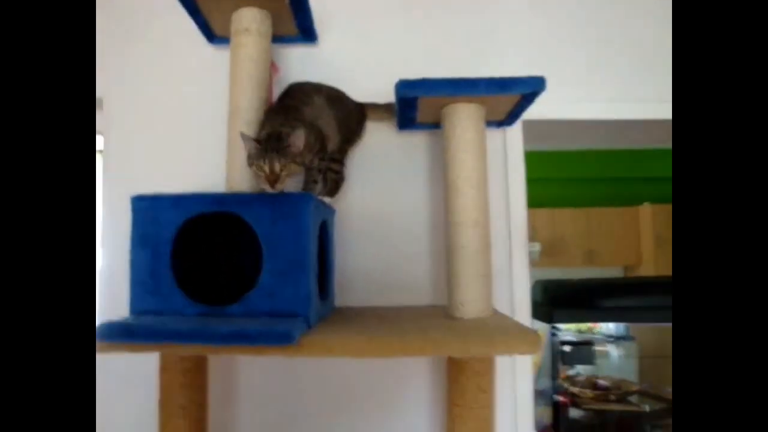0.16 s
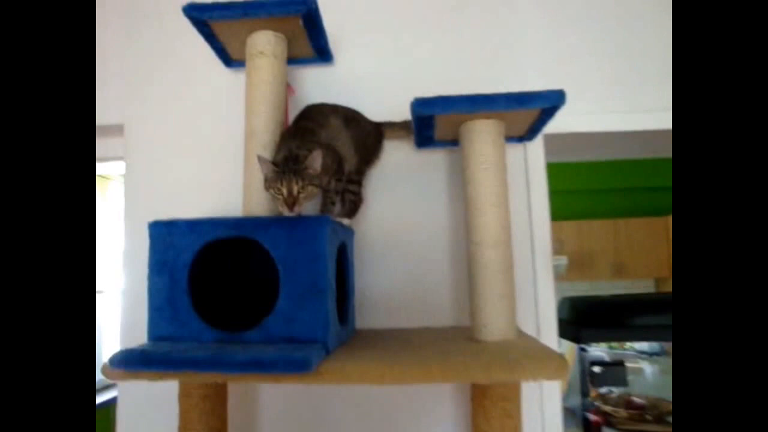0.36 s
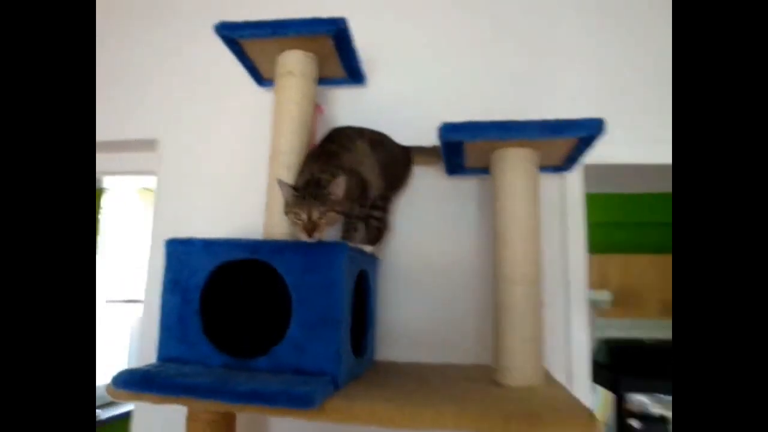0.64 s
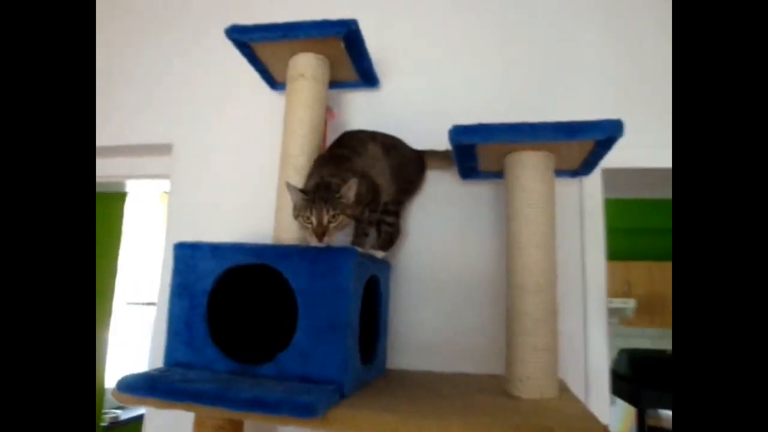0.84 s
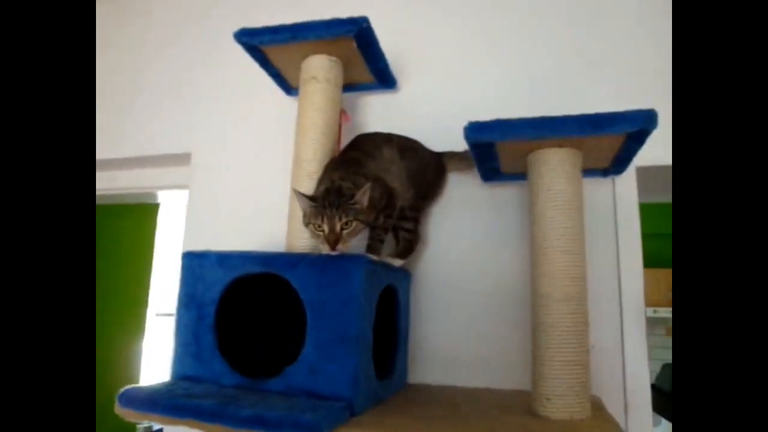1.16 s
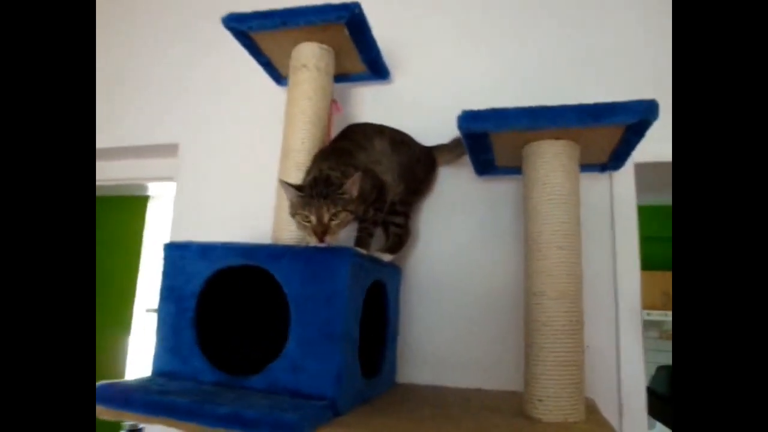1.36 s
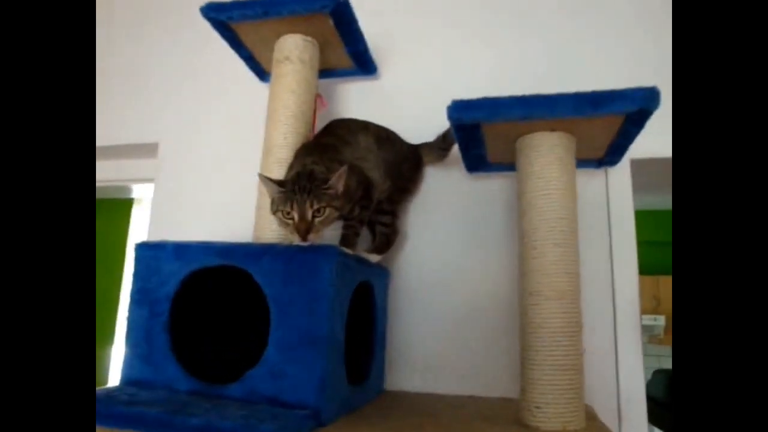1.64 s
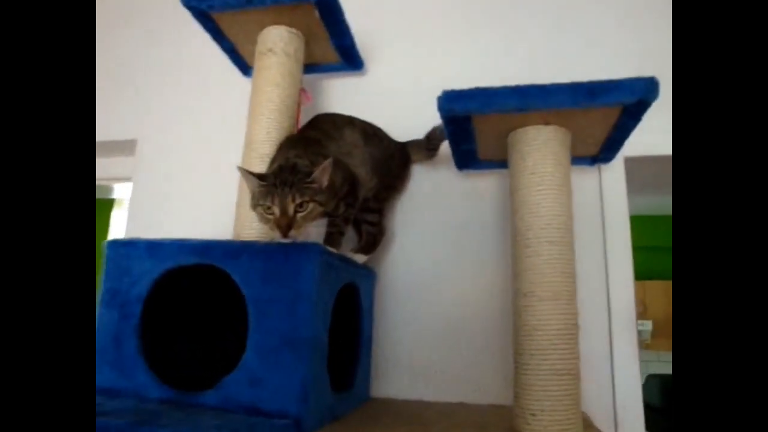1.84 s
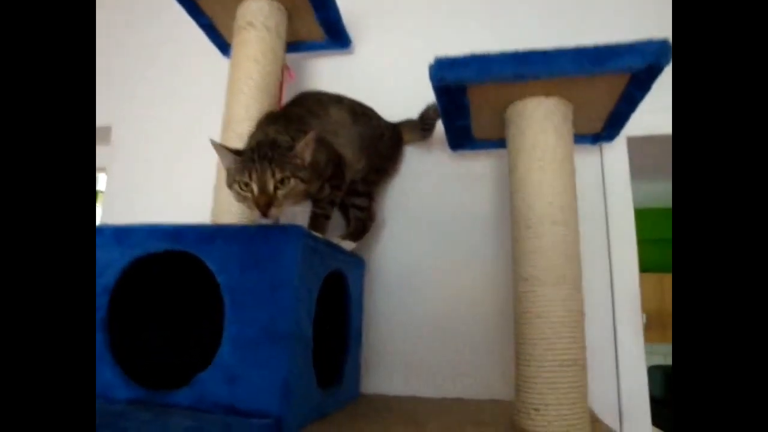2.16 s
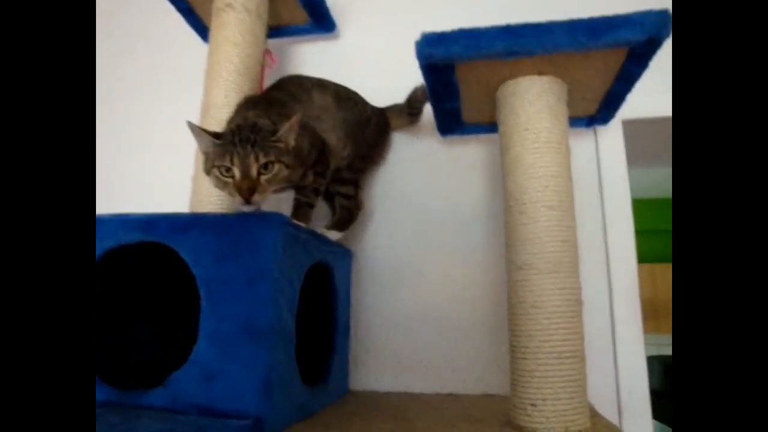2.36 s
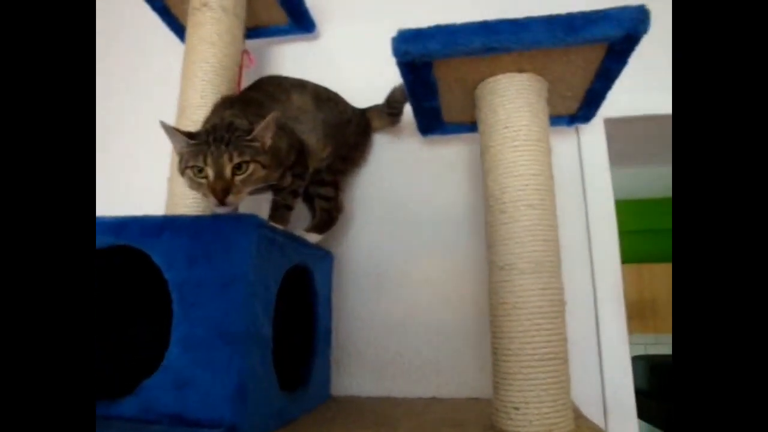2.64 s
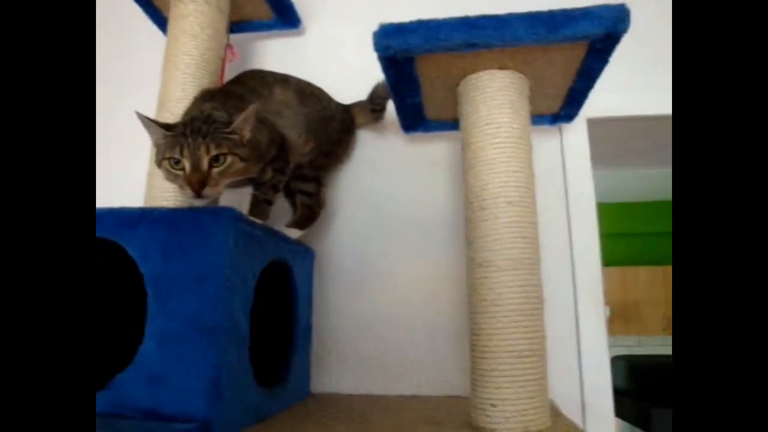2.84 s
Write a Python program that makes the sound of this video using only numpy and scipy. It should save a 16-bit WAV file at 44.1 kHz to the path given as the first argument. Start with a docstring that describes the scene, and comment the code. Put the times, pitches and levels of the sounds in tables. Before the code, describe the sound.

A cat's angry, closed-mouth yowl in a reverberant room, a couple of metres away. A dull knock at 0.1 s and sharp click at 0.2 s sit close to the microphone, then faint rubbing and short hisses at 0.5 and 0.9 s. From 1.1 s the yowl climbs, peaks near 1.5, wavers, and sinks by 2.6 into a rasping growl until 3. Light taps at 1.4, 1.8 and 2.2-2.3; steady hush.

```python
"""Angry yowl in a living room

A cat on a scratching tower, a couple of metres away, gives one closed-mouth yowl that climbs out of a grumble,
arches, wavers and sinks into a low growl: harmonics shaped by throat resonances, roughened by a trill and rasp.
Short hisses of turbulent noise precede it. Dry knocks and clicks at the microphone and light taps in the room
are damped modes with contact noise; faint rubbing and a steady hush are filtered noise, with a faint hum."""
import sys
import numpy as np
from scipy import signal
from scipy.fft import rfft, irfft
from scipy.io import wavfile

SR = 44100
rng = np.random.default_rng(int(sys.argv[2]) if len(sys.argv) > 2 else 0)


def persist_wave(psi):
    """Save psi, clipped to +-1, as 16-bit WAV."""
    counts = np.round(np.clip(psi, -1, 1) * 32767).astype(np.int16)
    wavfile.write(sys.argv[1], SR, np.atleast_2d(counts).T)


N = 132300

# Spectrum of the hush: (frequency [Hz], relative level per hertz [dB])
HUSH_SPECTRUM = [(18, -38), (30, -11), (76, -22), (186, -14.5), (220, -11.5), (243, -6), (317, -14.5),
                 (349, -6), (568, -8.5), (859, -9.5), (1960, -16), (5060, -17.5), (10000, -22),
                 (13000, -91), (22000, -120)]
# Partials of the hum: (frequency [Hz]) and (peak level [dB])
HUM_FREQUENCIES = (351, 443.6)
HUM_LEVELS = (-61.5, -63.5)
# Spectrum of contact noise: (frequency [Hz], relative level [dB])
CONTACT_SPECTRUM = [(150, -22.5), (700, 3.5), (1300, 0), (3000, 0), (6000, -2), (7200, -6.5),
                    (10000, -16.5)]
# Dull knock at the microphone: (time [s], level [dB], contact noise re level [dB])
KNOCK_BLOW = (0.0832, -20, -13.5)
# Modes of the knocked body: (frequency [Hz], relative level [dB], 60 dB decay time [s])
KNOCK_BODY = [(199, -18, 0.022), (400, -6, 0.016), (907, 5.5, 0.009), (1340, 3, 0.017), (1810, -20, 0.019)]
# Sharp clicks at the microphone: (time [s], level [dB], contact noise re level [dB])
CLICK_BLOWS = [(0.1012, -35, -18), (0.118, -42.5, -8), (0.188, -14.5, -10.5), (0.1889, -15, -12.5)]
# Modes of the clicking body: (frequency [Hz], relative level [dB], 60 dB decay time [s])
CLICK_BODY = [(230, -13.5, 0.016), (590, -6.5, 0.012), (785, -12.5, 0.032), (1097, -22, 0.041),
              (1413, -15, 0.033), (2100, -24, 0.034), (2420, -16, 0.022), (3160, -26, 0.017),
              (4200, -3, 0.014), (4730, -5, 0.016), (5420, -0.5, 0.0074), (7050, -14, 0.009),
              (8120, -5, 0.0062)]
# Taps in the room: (time [s], level [dB], contact noise re level [dB], pitch ratio [1], scuff level [dB])
TAP_BLOWS = [(.393, -42, -24, 0.92, -75), (1.36, -29.5, -21, 1.022, -70), (1.365, -27.5, -14, 1.01, -62),
             (1.829, -31, -20, 0.98, -71), (2.2369, -29, -14.5, 0.923, -49.5),
             (2.2945, -26, -19, 1.02, -52.5)]
# Modes of the tapped body at pitch ratio 1: (frequency [Hz], relative level [dB], 60 dB decay time [s])
TAP_BODY = [(1230, -2, 0.019), (1376, -2.5, 0.021), (1645, -2.5, 0.0089), (2217, -4, 0.01),
            (3300, -7, 0.0063), (4500, -22, 0.0049)]
# Spectrum of the scuffing: (frequency [Hz], relative level [dB])
SCUFF_SPECTRUM = [(800, -28), (2300, 10), (3300, -6), (4500, 1), (6200, -1), (7300, -20), (10000, -23)]
# Puffs of breath: (time [s], level [dB], centre frequency [Hz], width [Hz])
HISS_PUFFS = [(0.49, -49.5, 4630, 2600), (0.889, -38.5, 2510, 1970)]
# Pitch of the voice: (time [s], frequency [Hz])
VOICE_PITCH = [(1.09, 106.7), (1.16, 144), (1.2, 198), (1.25, 286.6), (1.3, 393.4), (1.36, 476.7),
               (1.43, 534), (1.52, 563.7), (1.59, 547.3), (1.68, 472.4), (1.79, 380.7), (1.9, 328),
               (1.98, 305.3), (2.08, 326.3), (2.18, 323.6), (2.28, 356.1), (2.38, 326), (2.46, 301.8),
               (2.5, 273.7), (2.55, 209.8), (2.6, 180.2), (2.7, 176.3), (3.0, 181.4)]
# Vocal effort: (time [s], fundamental level [dB], overtone level [dB], roughness [0-1], trill [0-1])
VOCAL_EFFORT = [(1.05, -85, -92, 0.3, 0), (1.15, -62, -83, 0.1, 0.1), (1.205, -51.5, -59, 0.7, 0.5),
                (1.23, -55, -50.5, .6, 0.5), (1.29, -48.5, -43, 0.6, .6), (1.345, -39, -39, 0.1, 0.3),
                (1.5, -38, -40, 0.01, 0.24), (1.61, -43, -41, 0.37, 0.2), (1.69, -37, -38.5, 0.14, 0.15),
                (1.8, -51.5, -38.5, 0.1, 0.5), (1.95, -63, -42.5, 0.08, .5), (2.17, -57, -46, 0.18, 1),
                (2.28, -51, -36.5, 0.08, 0.8), (2.4, -62.5, -43.5, 0.11, 0.2), (2.485, -57, -44, 0.29, 0.9),
                (2.51, -58, -37, .06, 0.1), (2.545, -54.5, -39.5, 0.19, 0.5),
                (2.575, -45.5, -45.5, 0.4, 0.6), (2.66, -55, -53, 0.62, 0.7), (2.72, -49.5, -51, 0.85, .4),
                (2.83, -51, -57, 0.74, 0.4), (3.0, -50, -59.5, 0.97, 0.2)]
# Throat with the mouth nearly shut: (frequency [Hz], gain [dB])
THROAT_RESPONSE = [(200, -4), (350, -5), (470, 3.5), (560, 0.5), (680, -11), (820, -18), (980, -15),
                   (1130, -27), (1350, -28.5), (2000, -42), (3500, -45)]
# Flutter and pulsing in the yowl's loudness: (centre time [s], half-length [s], rate [Hz], depth [0-1])
LOUDNESS_FLUTTERS = [(1.25, .07, 26, 0.3), (1.748, 0.1, 50, 0.25), (2.329, 0.11, 36, 0.5),
                     (2.75, 0.094, 15, 0.27)]

HUSH_DB, HUM_WAVER = -53.5, 0.0036  # waver: rms fraction of frequency
RUSTLE_S, RUSTLE_WIDTH_S, RUSTLE_DB = 0.36, 0.1, -54
KNOCK_RISE_S, CLICK_RISE_S, TAP_RISE_S = 0.0013, 0.00027, 0.0001  # time constants
KNOCK_CRACK_T60_S, CLICK_CRACK_T60_S, TAP_CRACK_T60_S = 0.021, 0.022, 0.15
SCUFF_RISE_S, SCUFF_DECAY_S, SCUFF_GRAIN_DB, SCUFF_GRAIN_HZ = 0.0025, 0.041, 6, 169.05
HISS_ATTACK_S, HISS_HOLD_S, HISS_RELEASE_S, HISS_BROAD_DB = 0.018, 0.017, 0.026, -7
# Irregularity at full roughness: rms fractions of pitch and gain, their rate, and the rasp level
JITTER, SHIMMER, FLUTTER_HZ, RASP_DB = 0.02, 0.088, 75, -11.5
SCATTER_RAD, SCATTER_HZ = 1.93, 67.4  # rms phase scatter of each overtone at full roughness
TRILL_HZ, TRILL_DEPTH, TRILL_SWING = 66.1, 0.13, 0.041  # a second vibration: fractions of gain and pitch
WAVER, WAVER_HZ = 0.007, 28  # rms fraction of pitch, at any roughness
THROAT_FOLLOW, THROAT_PITCH_HZ = 0.11, 332  # exponent and reference of the resonance shift with pitch
ROOM_T60_S, ROOM_GAP_S = 0.57, 0.0044
VOICE_ROOM_DB, HISS_ROOM_DB, TAP_ROOM_DB = -2, -3.5, -6.5
LOW_CUT_HZ, TOP_HZ = 49, 10080


def undb(db):
    """Decibel definition: amplitude gain is ten to the power of level over 20."""
    return 10 ** (np.asarray(db) / 20)


def unit(x):
    """Normalisation to a root-mean-square amplitude of 1."""
    return x / np.sqrt(np.mean(x ** 2))


def curve(table):
    """Linear interpolation of each column of a time table."""
    times, *columns = np.array(table).T
    return [np.interp(np.arange(N) / SR, times, column) for column in columns]


def response(points, hz):
    """Frequency response: decibels interpolated along logarithmic frequency."""
    at, db = np.array(points).T
    return undb(np.interp(np.log(np.maximum(hz, 1)), np.log(at), db))


def colour(x, gain_at):
    """Linear filtering: the spectrum is multiplied by a gain, then normalised to an rms of 1."""
    frequencies = np.arange(1, N // 2 + 2) * SR / N
    return unit(irfft(rfft(x) * gain_at(frequencies), N))


def noise(gain_at):
    """Spectral shaping of white noise, at an rms of 1."""
    return colour(rng.standard_normal(N), gain_at)


def wobble(hz):
    """Low-pass random fluctuation, mostly below the given rate, at an rms of 1."""
    return noise(lambda f: 1 / (1 + (f / hz) ** 4))


def turns(hz):
    """Instantaneous phase [rad]: the running integral of frequency."""
    return 2 * np.pi * np.cumsum(hz) / SR


def room(x, wet_db):
    """Reverberation: direct sound plus a diffuse, exponentially decaying tail from the walls."""
    t = np.arange(SR) / SR
    tail = rng.standard_normal(SR) * undb(-60 * t / ROOM_T60_S) * (t > ROOM_GAP_S)
    tail = tail / np.linalg.norm(tail)
    return x + undb(wet_db) * signal.fftconvolve(x, tail)[:N]


def strike(blows, modes, rise_s, crack_t60):
    """Modal excitation: each blow rings the same damped modes with a dying burst of contact noise."""
    out = np.zeros(N)
    t = np.arange(SR // 4) / SR

    def fade(t60):
        """Exponential decay by 60 dB in the given time."""
        return np.exp(-np.log(1000) * t / t60)

    ring = 0
    for k, (hz, db, t60) in enumerate(modes):
        polarity = (-1) ** k
        ring = ring + polarity * undb(db) * np.sin(2 * np.pi * hz * t) * fade(t60)
    crack = noise(lambda f: response(CONTACT_SPECTRUM, f))
    rise = 1 - np.exp(-t / rise_s)
    for start, db, crack_db in blows:
        first = int(start * SR)
        span = slice(first, first + len(t))
        contact = undb(crack_db) * crack[span] * fade(crack_t60)
        out[span] += undb(db) * (ring + contact) * rise
    return out


def background():
    """Stationary noise and tones: the steady hush of the home with a faint wavering hum."""
    hush = undb(HUSH_DB + 0.75 * wobble(36)) * noise(lambda f: response(HUSH_SPECTRUM, f))
    hum = 0
    for hz, db in zip(HUM_FREQUENCIES, HUM_LEVELS):
        hum = hum + undb(db) * np.sin(turns(hz * (1 + HUM_WAVER * wobble(17.4))))
    return hush + hum


def rustle():
    """Friction noise: faint handling close to the microphone swells and fades as a Gaussian."""
    swell = np.exp(-((np.arange(N) / SR - RUSTLE_S) / RUSTLE_WIDTH_S) ** 2)
    return swell * undb(RUSTLE_DB) * noise(lambda f: response(CONTACT_SPECTRUM, f))


def knock():
    """Modal excitation of low, quickly damped modes: a dull knock at the microphone."""
    return strike([KNOCK_BLOW], KNOCK_BODY, KNOCK_RISE_S, KNOCK_CRACK_T60_S)


def clicks():
    """Modal excitation with a brief rise: dry, sharp clicks at the microphone."""
    return strike(CLICK_BLOWS, CLICK_BODY, CLICK_RISE_S, CLICK_CRACK_T60_S)


def scuffs():
    """Friction noise: grainy scraping that lingers after each tap."""
    t = np.arange(N) / SR
    rubbing = 0
    for start, *_, db in TAP_BLOWS:
        age = t - start
        rise = np.clip(age / SCUFF_RISE_S, 0, 1)
        rubbing = rubbing + undb(db) * rise * np.exp(-np.maximum(age, 0) / SCUFF_DECAY_S)
    grain = undb(SCUFF_GRAIN_DB * wobble(SCUFF_GRAIN_HZ))
    return rubbing * grain * noise(lambda f: response(SCUFF_SPECTRUM, f))


def taps():
    """Modal excitation with scaled frequencies: each tap lands on a spot that rings higher or lower."""
    out = 0
    for *blow, ratio, _ in TAP_BLOWS:
        modes = [(hz * ratio, db, t60) for hz, db, t60 in TAP_BODY]
        out = out + strike([blow], modes, TAP_RISE_S, TAP_CRACK_T60_S)
    return out


def hisses():
    """Turbulence: brief puffs of noise with one broad resonance over a wider floor."""
    out, t = np.zeros(N), np.arange(N) / SR
    for start, db, hz, width in HISS_PUFFS:
        def spectrum(f):
            """Resonance plus broadband floor."""
            resonance = 1 / (1 + ((f - hz ** 2 / f) / width) ** 4)
            return resonance + undb(HISS_BROAD_DB) / (1 + (f / 6500) ** 8 + (400 / f) ** 4)

        age = t - start
        attack = np.clip(age / HISS_ATTACK_S, 0, 1)
        release = np.exp(-np.maximum(age - HISS_ATTACK_S - HISS_HOLD_S, 0) / HISS_RELEASE_S)
        out += undb(db) * noise(spectrum) * attack * release
    return out


def loudness_flutter():
    """Amplitude modulation: here and there the level flutters or pulses, as when echoes beat with a glide."""
    t, gain = np.arange(N) / SR, 1
    for centre, reach, hz, depth in LOUDNESS_FLUTTERS:
        beat = np.sin(turns(hz * (1 + 0.058 * wobble(12.6))))
        gain = gain * (1 + depth * np.exp(-((t - centre) / reach) ** 4) * beat)
    return gain


def yowl():
    """Source and filter: harmonics glide through throat resonances; trill adds sidebands, roughness rasp."""
    pitch, = curve(VOICE_PITCH)
    fundamental_db, overtone_db, rough, trilling = curve(VOCAL_EFFORT)
    rough = np.clip(rough, 0, 1)
    trill = trilling * np.sin(turns(TRILL_HZ * (1 + 0.0882 * wobble(12.7))))
    unsteady = 1 + JITTER * rough * wobble(FLUTTER_HZ) + TRILL_SWING * trill + WAVER * wobble(WAVER_HZ)
    phase = turns(pitch * unsteady)

    # The throat resonances sink a little with the pitch.
    opening = (pitch / THROAT_PITCH_HZ) ** THROAT_FOLLOW
    overtones = 0
    for k in range(2, 12):
        scatter = SCATTER_RAD * rough * wobble(SCATTER_HZ)
        overtones = overtones + response(THROAT_RESPONSE, k * pitch / opening) * np.sin(k * phase + scatter)

    # Rasp is noise released in puffs, once per cycle of the pitch.
    puffs = (1 + np.cos(phase)) * rng.standard_normal(N)
    throat_noise = colour(puffs, lambda f: response(THROAT_RESPONSE, f) / (1 + (320 / f) ** 7))
    rasp = undb(RASP_DB) * rough * throat_noise

    upper = undb(overtone_db) * (overtones * (1 + TRILL_DEPTH * trill) + rasp)
    voice = undb(fundamental_db) * np.sin(phase) + upper
    started = np.arange(N) / SR > VOCAL_EFFORT[0][0]
    shimmer = 1 + SHIMMER * rough * wobble(FLUTTER_HZ)
    return np.sqrt(2) * voice * loudness_flutter() * started * shimmer


def scene():
    """Superposition: cat and taps reverberate in the room; knock, clicks and rustle stay dry and close."""
    far = room(yowl(), VOICE_ROOM_DB) + room(hisses(), HISS_ROOM_DB) + room(taps() + scuffs(), TAP_ROOM_DB)
    near = knock() + clicks() + rustle()
    return (far + near + background())[None]


def record(dry):
    """Band limiting: the small microphone loses the deep bass; the recorder cuts the top steeply."""
    bass_cut = signal.butter(2, LOW_CUT_HZ, "high", fs=SR, output="sos")
    top_cut = signal.ellip(12, .2, 70, TOP_HZ, fs=SR, output="sos")  # ripple and stopband in dB
    return signal.sosfilt(top_cut, signal.sosfilt(bass_cut, dry))


dry = scene()
out = record(dry)
persist_wave(out)
```